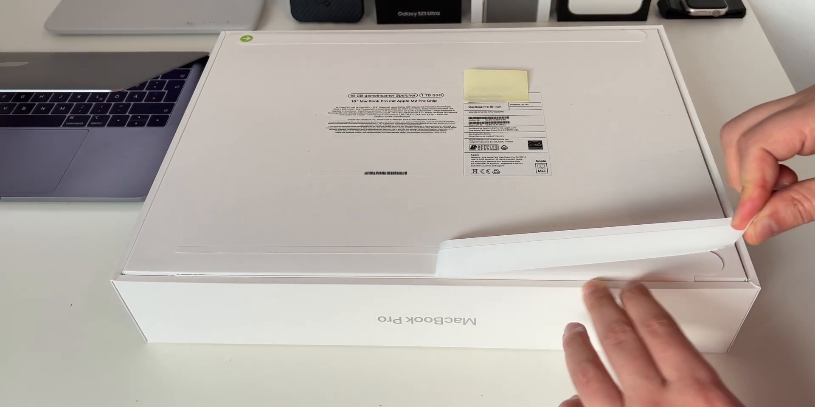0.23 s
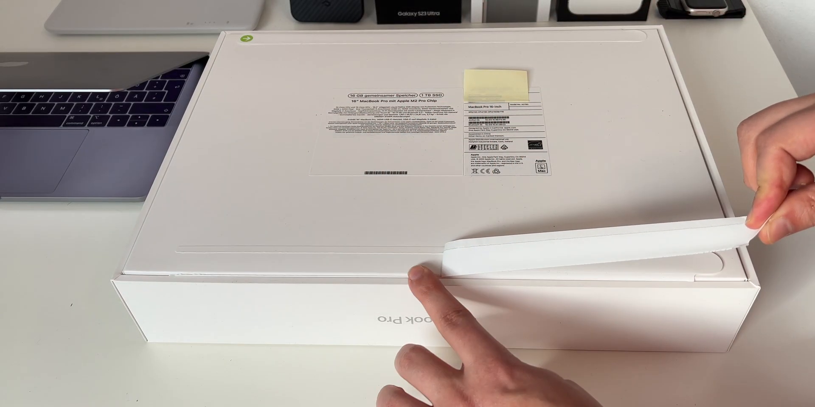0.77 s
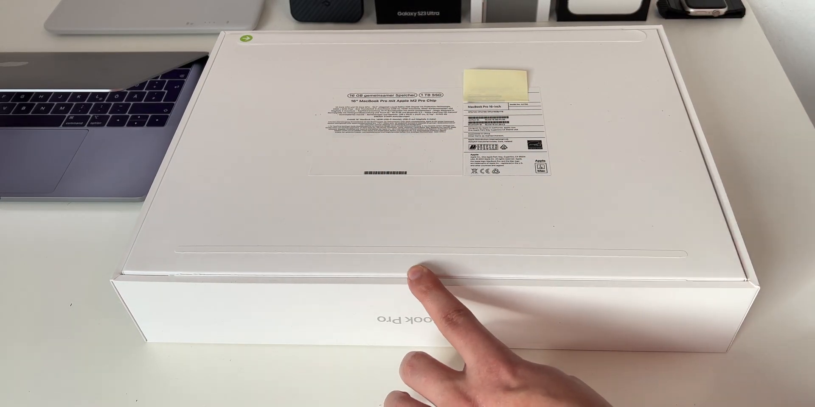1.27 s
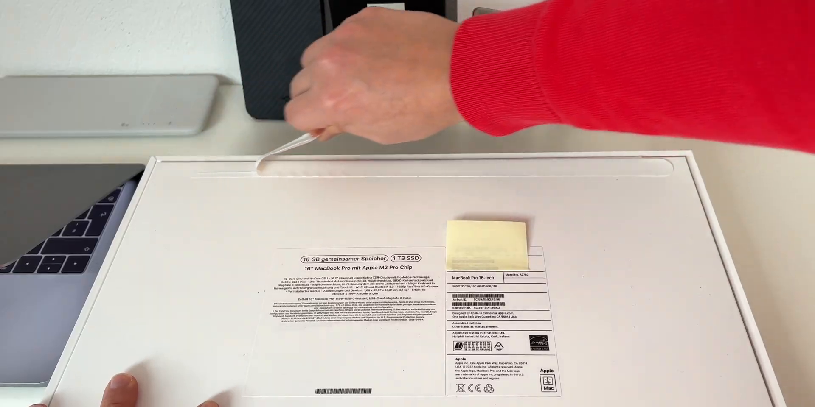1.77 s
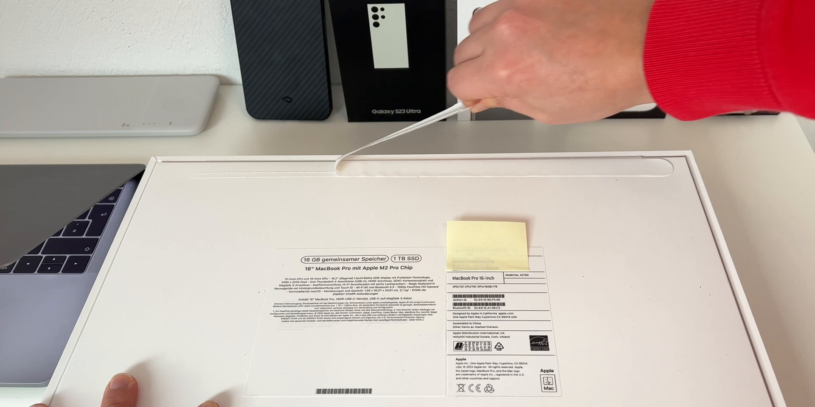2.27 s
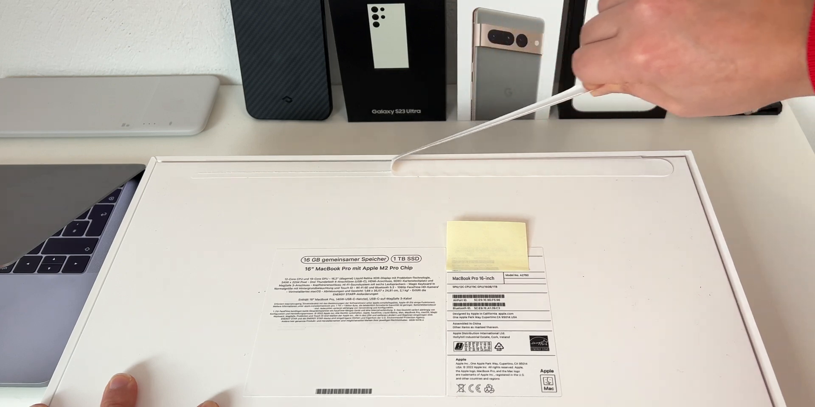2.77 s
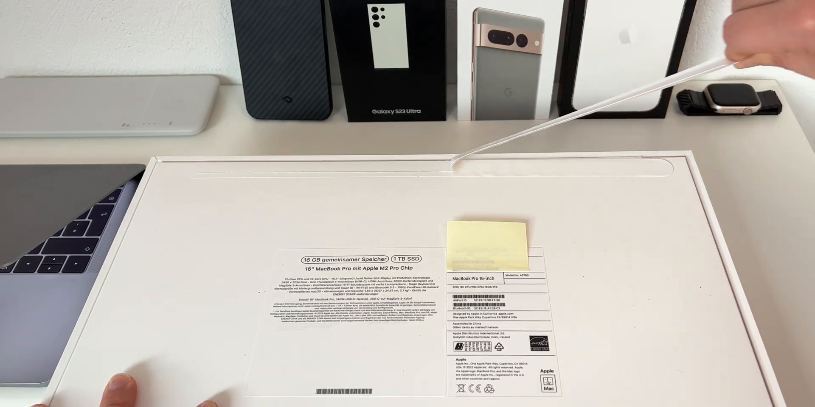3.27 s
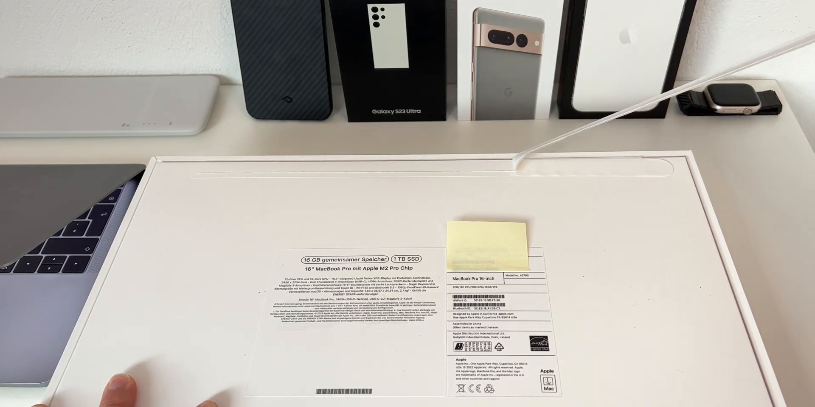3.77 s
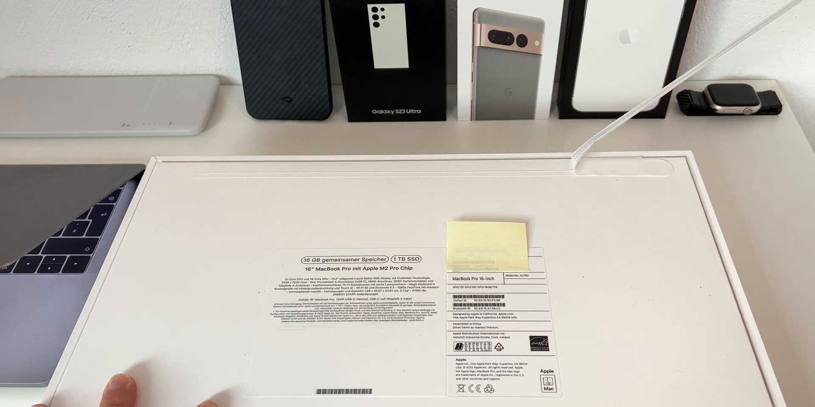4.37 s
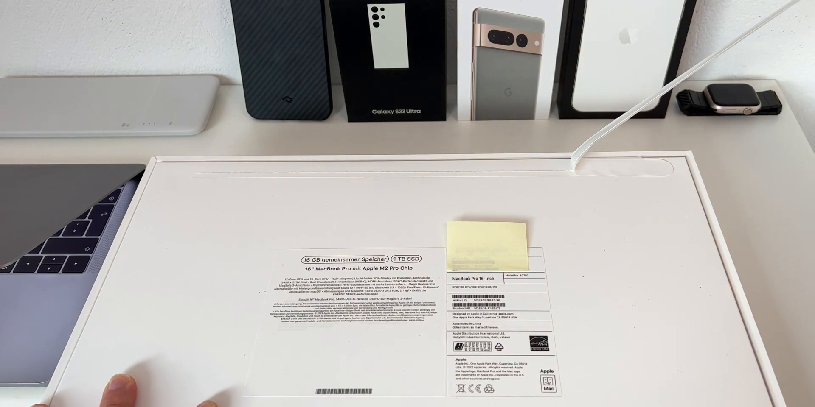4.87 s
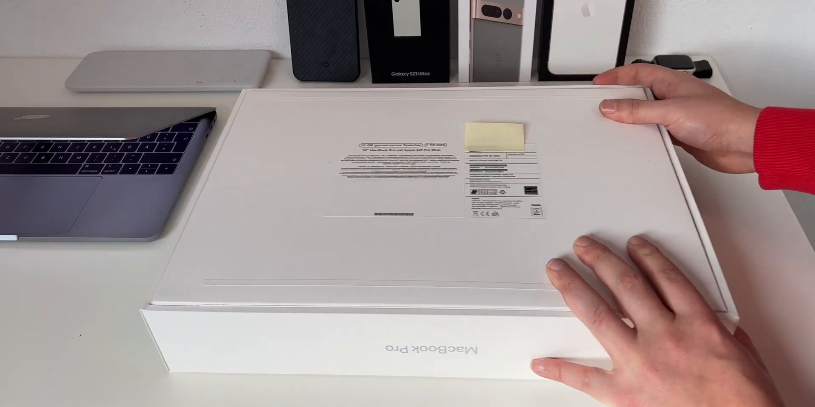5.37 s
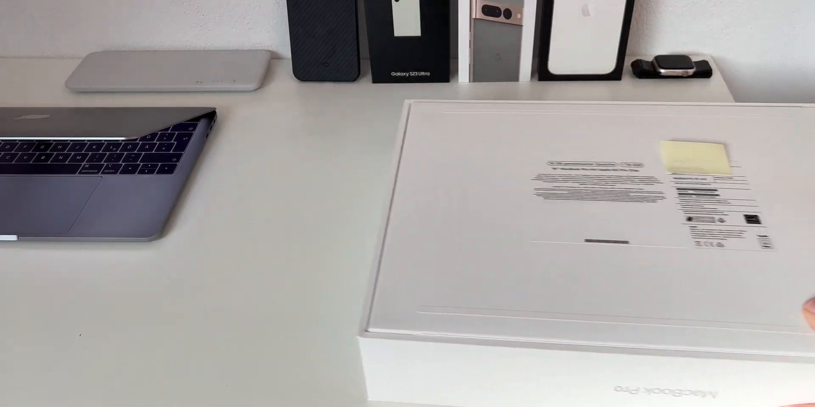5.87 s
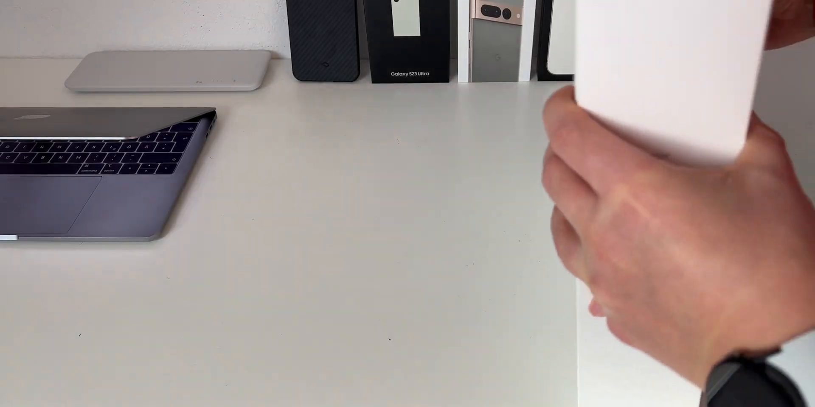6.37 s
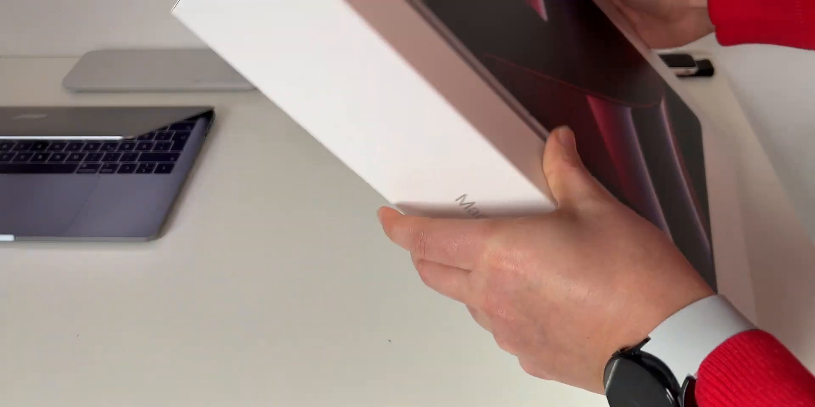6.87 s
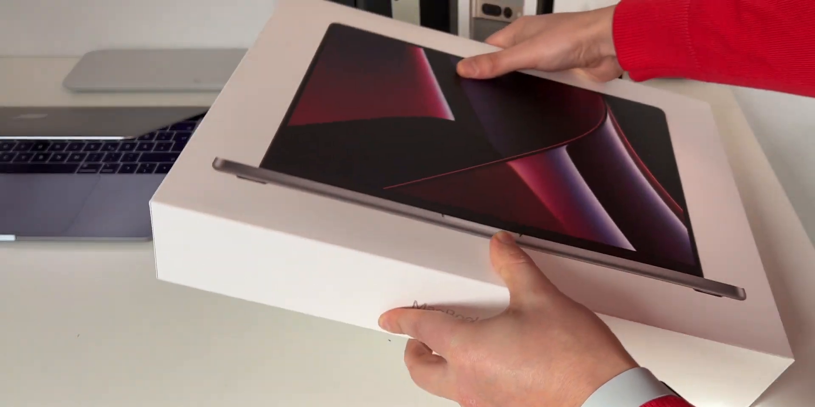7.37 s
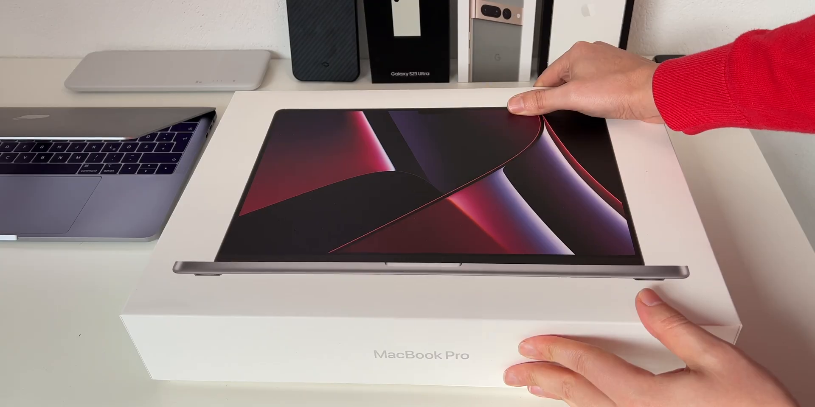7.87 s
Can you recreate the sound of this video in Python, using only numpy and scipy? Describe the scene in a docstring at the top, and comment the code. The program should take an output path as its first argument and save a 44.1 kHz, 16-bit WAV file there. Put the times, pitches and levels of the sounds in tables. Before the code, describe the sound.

Close stereo pickup in a quiet room with a faint wavering rumble, slight hiss and a short soft reverb. From 0 to 0.35 s glued paper crackles and snaps, thinning to sparse ticks and faint finger rubbing. At 0.9 s a dense rip swells, ending in a hard pop at 1.2 s. After a cut near 1.4 s, a second strip peels slowly until 4.3 s: grainy crackle with irregular sharp snaps, its colour shifting as the strip lengthens. A pause, then a loud, fast rip at 4.95 s and a pop at 5.02 s. Around 5.12 s the box is set down in clustered hollow knocks, then slides with smooth hiss from 5.25 to 6 s, ending in a click. From 6.25 s come low drags, bumps and skin rubbing while it turns. At 7.63 s it drops flat with a heavy, ringing thud, then settles softly past 8 s.

```python
"""On a desk in a quiet, faintly rumbling room, two paper strips peel off a large cardboard box in crackling breaks
and snaps; each ends in a dense rip and a pop. Fingers rub the box between pulls. Then the box is set down, slid in
smooth friction over the desk, dragged, turned in the hands and dropped flat: its modes ring in a heavy thud and it
settles. A stereo microphone pair hears level and arrival time, with decaying noise as the room's reply.
The sound is an edit of several shots, so some tails stop short."""
import sys
import numpy as np
from scipy import signal
from scipy.fft import rfft, irfft
from scipy.io import wavfile
from scipy.ndimage import map_coordinates

SR = 44100
rng = np.random.default_rng(int(sys.argv[2]) if len(sys.argv) > 2 else 0)


def wav_record(signal):
    """Record a signal, one row per channel, as 16-bit PCM in the file named by sys.argv[1]."""
    frames = np.transpose(np.atleast_2d(signal))
    bounded = np.clip(frames, -1, 1)
    # unit amplitude maps onto the largest positive 16-bit level
    quanta = np.round(bounded * 32767).astype(np.int16)
    wavfile.write(sys.argv[1], SR, quanta)


N = 357651
T = np.arange(N) / SR
ROOM_BASS_HZ = 160   # bass below this is much alike on both sides
# where each shot begins: [start_s]
SHOT_STARTS = [0, 1.385, 5.072, 6.04, 6.745, 7.872]


def amp(db):
    """Decibels to amplitude."""
    return 10 ** (np.asarray(db) / 20)


def rms_one(x):
    """Scales a signal to an RMS of one."""
    return x / np.sqrt(np.mean(x ** 2) + 1e-20)


def at_hz(points, hz):
    """Reads the second column of a table at a frequency, on a logarithmic axis."""
    points = np.array(points)
    return np.interp(np.log(hz), np.log(points[:, 0]), points[:, 1])


def colour(x, tone, size=4096):
    """A causal (minimum-phase) filter of the given spectrum, from its folded cepstrum."""
    hz = np.arange(size // 2 + 1) * SR / size + 1
    cepstrum = irfft(np.log(amp(at_hz(tone, hz))))
    cepstrum[1:size // 2] *= 2
    cepstrum[size // 2 + 1:] = 0
    response = irfft(np.exp(rfft(cepstrum)))
    return signal.fftconvolve(x, np.atleast_2d(response), axes=-1)[:, :x.shape[-1]]


def butter(x, hz, kind, order=4):
    """A Butterworth filter."""
    return signal.sosfilt(signal.butter(order, hz, kind, fs=SR, output="sos"), x)


def drift(rate_hz, size):
    """Random wandering of spread one: noise through two equal low-pass poles."""
    r = np.exp(-2 * np.pi * rate_hz / SR)
    noise = rng.standard_normal(size + 8000)
    return rms_one(signal.lfilter([1], [1, -2 * r, r * r], noise)[8000:])


def placed(x, pan_db):
    """Pans a stereo pair, positive to the left: the nearer microphone hears a source louder and earlier."""
    lead_s_per_db, most_lead_s = 4.5e-5, 2e-4
    half_db = np.array([[.5], [-.5]]) * (pan_db + np.zeros(x.shape[1]))
    lead_s = np.clip(half_db * lead_s_per_db, -most_lead_s / 2, most_lead_s / 2)
    at = np.arange(x.shape[1]) + (lead_s - most_lead_s / 2) * SR
    channel = np.arange(2)[:, None] + 0 * at
    return amp(half_db) * map_coordinates(x, [channel, at], order=3)


def fading(x):
    """The end of a shot fades to nothing in 1.2 ms."""
    left_s = T[:x.shape[-1]][::-1]
    return x * np.minimum(left_s / 0.0012, 1)


def wandering_ring(x, t, rows, width_hz, size=256):
    """A resonance whose centre and level move; the centre steps in short blocks."""
    s, hz, db = np.transpose(rows)
    out, state = np.zeros_like(x), np.zeros((2, 2))
    r = np.exp(-np.pi * width_hz / SR)
    for i in range(0, len(t), size):
        w = 2 * np.pi * np.interp(t[i], s, hz) / SR
        poles = [1, -2 * r * np.cos(w), r * r]
        out[:, i:i + size], state = signal.lfilter([1, 0, -1], poles, x[:, i:i + size], zi=state)
    return amp(np.interp(t, s, db)) * rms_one(out)


def friction(rows, tones, per_s, spread_db, clump_db, clump_hz, hiss_db, apart_db, pans_db, blend_s=None, rings=()):
    """Clumped tiny breaks over a hiss, coloured; the surface and the box walls follow their own levels."""
    split_hz = 1500   # under it the box walls radiate, over it the paper or skin itself
    s, surface_db, wall_db = np.transpose(rows)
    span = slice(round(s[0] * SR), min(N, round(s[-1] * SR)))
    t = T[span]
    size_db = spread_db * np.minimum(rng.exponential(1, len(t)), 4)
    sizes = amp(size_db) * rng.choice([-1, 1], len(t))
    breaks = rms_one(sizes * (rng.random(len(t)) < per_s / SR))
    stick_slip = amp(clump_db * drift(clump_hz, len(t)))
    mid = breaks + amp(hiss_db) * rng.standard_normal(len(t))
    # other contact spots reach each microphone
    side = amp(apart_db) * butter(rng.standard_normal(len(t)), ROOM_BASS_HZ, "high", order=1)
    force = stick_slip * (mid + side * [[1], [-1]])
    sound = colour(force, tones[0])
    if blend_s is not None:
        share = np.interp(t, blend_s, [0, 1])
        sound = (1 - share) * rms_one(sound) + share * rms_one(colour(force, tones[1]))
    sound = sound + sum(wandering_ring(force, t, *ring) for ring in rings)
    surface = amp(np.interp(t, s, surface_db)) * rms_one(butter(sound, split_hz, "high"))
    low = butter(sound, split_hz, "low") / stick_slip ** 0.1   # heavy walls even it out
    walls = amp(np.interp(t, s, wall_db)) * rms_one(low)
    out = np.zeros((2, N))
    travel_db = np.linspace(*pans_db, len(t))      # the contact moves along the box
    out[:, span] = placed(surface + walls, travel_db) * signal.windows.tukey(len(t), 400 / len(t))
    return out


def stroke(ease_s, swell_s, hold_s, fade_s, full_db, ease_db, wall_db):
    """A stroke swells, drifts between two levels and dies away; the walls take up the swell more gently."""
    rise_power, fall_db, wall_swell = 1.21, 37, 0.66
    since = np.arange(0, swell_s + hold_s + fade_s, .001)
    swell_db = rise_power * 20 * np.log10(np.clip(since / swell_s, 1e-3, 1))
    corners_s = np.cumsum([swell_s, hold_s, fade_s])
    rest_db = np.interp(since, corners_s, [full_db, ease_db, ease_db - fall_db])
    s = ease_s - hold_s - swell_s + since
    return np.transpose([s, rest_db + swell_db, rest_db + wall_swell * swell_db + wall_db])


def hush():
    """The still room: a low wavering rumble and microphone hiss."""
    # spectrum of the still room: [pitch_hz, level_db per Hz]
    hush_tone = [(38, -13), (55, -8.5), (66, -8.5), (80, -16.5), (1330, -42.5), (7510, -50), (10100, -67.5),
                 (11900, -48.5), (16000, -87.5)]
    noise = colour(rng.standard_normal((2, N + SR)), hush_tone)[:, SR:]
    pair = noise[0] + amp(-7.5) * noise[1] * [[1], [-1]]
    return amp(-58 + 2.2 * drift(3.3, N)) * rms_one(pair)


def strips():
    """Glued paper parts in crackling breaks under slow pulls; the last fast pull on each strip is a dense rip."""
    # pulls on the strips: [time_s, surface_db, box_wall_db]
    first_peel = [(0.0, -31.5, -43), (0.214, -36, -47.5), (0.298, -46, -55), (.36, -47, -76)]
    first_rip = [(0.894, -67.5, -81.5), (0.93, -38, -53), (1.038, -23.5, -27.5), (1.126, -22, -20.5),
                 (1.2, -20.5, -26.5), (1.228, -36.5, -45.5), (1.324, -59.5, -57.5), (1.36, -84, -85)]
    second_peel = [(1.39, -50, -45), (1.409, -39, -39), (1.69, -31.5, -38.5), (2.0, -31, -41.5),
                   (2.5, -35, -41), (3.3, -33, -40.5), (3.88, -35.5, -37.5), (4.25, -40, -44),
                   (4.309, -47.5, -60.5), (4.4, -95, -97)]   # the long slow pull
    second_rip = [(4.92, -63, -66), (4.956, -25, -36), (5.026, -15, -20.5), (5.038, -62, -28),
                  (5.07, -63.5, -72)]
    # their colours: [pitch_hz, level_db per Hz]
    first_peel_tone = [(40, -15), (214, -13.5), (301, -14), (452, -8.5), (554, -11), (1340, -19),
                       (2160, -4.5), (2420, -2), (2770, 0), (9000, -2.5), (12000, -11), (16000, 0)]
    first_rip_tone = [(40, -26), (81, -2.5), (137, -24.5), (354, -11), (615, -15.5), (800, -4.5),
                      (1100, -6.5), (1520, -19.5), (2630, -6.5), (3930, -9), (8340, -14), (12000, -16.5),
                      (16000, -12.5)]
    short_strip_tone = [(40, -16), (93, -3.5), (146, -10), (229, -4.5), (322, -14), (518, -7), (621, -22.5),
                        (760, -13), (1140, -17), (1550, -23), (1700, -27.5), (2500, -17.5), (3100, -14),
                        (3500, -18), (5470, -12), (9000, -19.5), (12000, -24), (16000, -22.5)]
    long_strip_tone = [(40, -11), (99, -1.5), (137, -14.5), (215, 4), (269, -10), (529, -4.5), (680, -12.5),
                       (810, -8.5), (1500, -11), (1750, -13.5), (3200, -20), (3600, 1.5), (4600, -11),
                       (5200, -7.5), (8340, -7.5), (12000, -26), (16000, -17.5)]
    second_rip_tone = [(40, -21), (503, -9), (1070, -9.5), (1210, -16.5), (1550, -9), (1810, -12.5),
                       (4240, 1.5), (5720, -9), (8340, -6.5), (12000, -20.5), (16000, -7.5)]
    # the loose end lengthens and the short colour gives way to the long one: [start_s, end_s]
    strip_grows_s = [2.7, 4.06]
    # rings that wander as the tear travels along the box: [time_s, pitch_hz, level_db against the whole pull]
    panel_ring = [(1.39, 1570, -29), (1.8, 1400, -17), (2.15, 1180, -18.5), (2.5, 950, -19.5),
                  (2.75, 790, -23), (3.2, 810, -50), (3.8, 1400, -18), (4.1, 790, -29), (4.3, 760, -11)]
    strip_ring = [(1.39, 5920, 7), (2.3, 5430, -48), (2.7, 4000, -12), (3.3, 3670, -39), (3.55, 3930, -8),
                  (3.85, 4200, -5), (4.05, 4410, -4), (4.4, 4530, -9)]
    rings = [(panel_ring, 110), (strip_ring, 800)]   # with widths in Hz
    peel_1 = friction(first_peel, [first_peel_tone], per_s=4000, spread_db=2.6, clump_db=2.2, clump_hz=90,
                      hiss_db=-4, apart_db=-6, pans_db=(.8, .3))
    rip_1 = friction(first_rip, [first_rip_tone], per_s=8000, spread_db=6.6, clump_db=1.6, clump_hz=64,
                     hiss_db=0.09, apart_db=-5.5, pans_db=(.3, -.1))
    peel_2 = friction(second_peel, [short_strip_tone, long_strip_tone], per_s=4000, spread_db=3.0, clump_db=2.6,
                      clump_hz=150, hiss_db=-5, apart_db=-5.5, pans_db=(3.8, -.5),
                      blend_s=strip_grows_s, rings=rings)
    rip_2 = friction(second_rip, [second_rip_tone], per_s=8000, spread_db=3.7, clump_db=2.6, clump_hz=60,
                     hiss_db=0.12, apart_db=-6.5, pans_db=(.4, .3))
    return peel_1 + rip_1 + peel_2 + rip_2


def snaps():
    """Each release is a burst under 14 ms that rings the loose paper; the long pull also crackles at random."""
    # single fibres and glue spots letting go, later fingertips unsticking from the card: [time_s, peak_db]
    releases = [(0.036, -23), (0.069, -14), (0.0914, -21), (0.1531, -29), (0.185, -28), (0.2075, -22),
                (0.2239, -19), (0.2778, -39), (0.294, -33), (0.3202, -27), (0.3596, -36.5), (0.4594, -43),
                (0.4853, -28.5), (0.544, -42), (0.5916, -32), (0.6398, -33), (0.9193, -35), (0.9288, -32),
                (0.9632, -24), (1.0415, -15), (1.3825, -39), (1.4032, -26), (1.4172, -29), (1.423, -24),
                (1.4395, -23), (1.4526, -19), (1.4932, -17), (1.5128, -26), (1.5752, -11), (1.586, -26),
                (1.614, -22), (1.625, -27), (1.666, -19), (1.714, -17), (1.841, -27), (1.8833, -24),
                (1.9673, -17), (2.0862, -25), (2.162, -22), (2.202, -23), (2.3638, -26), (2.7077, -25),
                (2.78, -25), (2.9085, -25), (3.158, -23), (3.3094, -23), (3.3831, -10.5), (3.4191, -26),
                (3.526, -33), (3.569, -24), (3.6142, -18), (3.8706, -25), (3.907, -19), (3.9818, -31),
                (4.035, -28), (4.0637, -20.5), (4.091, -27), (4.194, -27), (4.2393, -18), (4.9355, -27),
                (5.518, -20), (5.545, -22), (6.2552, -29), (6.5955, -21.5)]
    # what a release sets ringing: [time_s, pitch_hz]
    release_ring = [(.25, 2700), (.27, 5220), (1.6, 6200), (1.62, 5400), (3.3, 5300), (3.38, 3800),
                    (4.3, 4300), (6.26, 2700), (6.6, 3800)]
    # where the paper parts: [time_s, left_right_db]
    strip_pan = [(1.3, 3), (1.385, 5), (4.3, 2)]
    # small releases all along the long pull: [start_s, end_s]
    crackle_s = [1.42, 4.28]
    crackle_per_s, crackle_db, crackle_spread_db = 150, -31, 2.5
    rise_s, fade_t60_s, width_hz, pitch_scatter, edge_db = .0005, .012, 1500, .1, -8
    out, t = np.zeros((2, N)), T[:600]
    tail = (1 - np.exp(-t / rise_s)) * amp(-60 * t / fade_t60_s)
    born = (rng.random(N) < crackle_per_s / SR) & (T > crackle_s[0]) & (T < crackle_s[1])
    crackle = np.transpose([T, crackle_db + crackle_spread_db * rng.standard_normal(N)])[born]
    noise = butter(rng.standard_normal(N + 600), [800, 7000], "band", order=1)
    scatter = rng.standard_normal(N)
    r = np.exp(-np.pi * width_hz / SR)
    for s, peak_db in [*releases, *crackle]:
        start = round(s * SR)
        pan_db = np.interp(s, *np.transpose(strip_pan))
        hz = np.interp(s, *np.transpose(release_ring)) * (1 + pitch_scatter * scatter[start])
        burst = tail * noise[start:start + 600]
        ring = signal.lfilter([1 - r, 0, r - 1], [1, -2 * r * np.cos(2 * np.pi * hz / SR), r * r], burst)
        tick = ring + amp(edge_db) * burst      # the bare edge of the tick reaches into the mids
        pair = np.outer([1, 1], tick / np.abs(tick).max())
        out[:, start:start + 600] += amp(peak_db) * placed(pair, pan_db)
    return out


def handled_box():
    """Skin rubs and shifts on the card in strokes of friction; the box turns in the hands and settles at last."""
    # strokes: [ease_start_s, swell_s, hold_s, fade_s, full_surface_db, easing_surface_db, walls_against_surface_db]
    handling = [(.65, 0.033, 0.33, 0.03, -67, -53, -19), (6.265, 0.0062, .22, 0.28, -46, -42.5, -0.5),
                (6.62, 0.052, 0.14, 0.13, -45, -47.5, 5), (6.66, .012, 0.019, 0.36, -37, -38, 3),
                (6.9, .01, .15, 0.11, -60.5, -53, 8.5), (7.55, 0.11, .3, 0.12, -59.5, -60.5, 11),
                (7.62, 0.057, 0.022, 0.033, -52.5, -45, 13)]
    turning = [(7.07, .1, .09, 0.4, -39, -39, 4.4)]
    settling = [(8.0, 0.00296, .12, 0.17, -69.5, -66.5, 16.2), (8.11, 0.0092, .09, .01, -60, -61, 9.1)]
    # their colours: [pitch_hz, level_db per Hz]
    handling_tone = [(60, -16), (250, -3), (550, -5.5), (750, -8), (1050, -7), (1300, -9.5), (1900, -6),
                     (2600, -0.5), (4000, -5.5), (8000, -4.5), (12000, -17), (16000, -10)]
    turning_tone = [(60, -25), (300, -11), (420, -5), (580, -3), (720, -9), (1020, -4.5), (1250, -11.5),
                    (1700, -10.5), (2400, -10), (7940, -15.5), (12000, -31), (16000, -27)]
    settle_tone = [(60, -11), (250, -7), (480, 5), (700, -9), (1500, -23), (2600, -37), (16000, -69)]
    out = np.zeros((2, N))
    for rows, tone in [(handling, handling_tone), (turning, turning_tone), (settling, settle_tone)]:
        for row in rows:
            out += friction(stroke(*row), [tone], per_s=3000, spread_db=3.0, clump_db=1.65, clump_hz=32,
                            hiss_db=0.1, apart_db=-2.1, pans_db=(-.6, -.7))
    return out


def pops_and_blows():
    """Each pop or blow cracks, rattles and rings all box modes, highs first, for 1/3 s or until its shot ends."""
    # pops of the strips and blows on the box:
    # [time_s, crack_db, thud_db, boom_db, knock_db, ring_length_share, left_right_db]
    hit_rows = [(.5142, -39, -54, -59, -58, 0.99, 2.5), (1.2013, 1.5, -31.5, -30, -20, 0.12, 2.5),
                (5.0225, -5, -33, -32.5, -20.5, 0.2, 1.5), (5.114, -34, -40, -28, -18.5, 0.32, -5),
                (5.121, -17.5, -22, -8.5, -16.5, 0.4, 0.5), (5.1277, -9, -30.5, -12.5, -24, 0.95, -1),
                (5.1583, -10, -25, -25, -18, 0.74, -1), (5.9817, -13, -40.5, -36.5, -35, 0.85, 3.5),
                (6.264, -57, -25.5, -28.5, -43.5, 1.1, 1), (6.4568, -37, -66, -62, -48, .26, 0),
                (6.6285, -50, -26.5, -27.5, -21, 0.27, 2), (6.66, -22, -26, -40, -36, 1.1, 3.5),
                (7.1, -73, -49, -29.5, -46.5, 1.23, -1.5), (7.423, -60, -58, -47, -54, 0.24, 1),
                (7.489, -52, -49, -55, -48, .3, 1), (7.558, -39.5, -47, -63, -45, 0.49, -1.5),
                (7.587, -39, -60, -55, -49, .3, -3), (7.6282, -14.5, -8.5, -15, -5.5, 1.3, 0.1),
                (7.638, -35, -9, -16, -11, 1.39, 3), (7.8, -42, -32, -52, -38, 0.86, -3)]
    # modes of box and desk top, before each hit's shift and share: [pitch_hz, level_db, t60_s]
    box_modes = [(42.6, -11, 0.89), (63.7, 3.5, 0.24), (81.4, -8.5, 0.49), (99.4, -2.5, 0.69),
                 (124.2, -3, 0.45), (152, 0, 0.19), (178.2, -4.5, 0.4), (231.9, -2, 0.44), (266, 3, 0.1),
                 (323.1, 0.5, 0.29), (360.3, -2.5, 0.27), (417.6, -5, 0.32), (465, 2.5, 0.11),
                 (513.7, -1, 0.18), (573, 4, 0.12), (686, 2, 0.086), (891, -3, 0.096), (1042, 7.5, 0.035),
                 (1500, -1, 0.078), (1818, -3.5, 0.097)]
    # where thud, boom, knock and tap are read: [pitch_hz]
    hit_bands_hz = [90, 190, 450, 1400]
    crack_t60_s, rattle_t60_s, rattle_db, rattle_rise_s = 0.041, 0.39, -14, 0.0036   # rattle t60 before its share
    tap_db, tap_follows = -7, 0.38   # the high modes lie between knock and crack
    detune = 0.047                   # each grip shifts the modes a little
    spread_cycles, latest_s = 1.1, .009   # bending waves: the lows arrive later than the highs, up to 9 ms
    ring_rise_cycles = 0.41          # walls take a moment to get going
    out, size = np.zeros((2, N)), SR // 3
    rest_hz, mode_db, t60 = np.array(box_modes).T[:, :, None]
    chance = rng.standard_normal((len(hit_rows), 4, len(box_modes), 1))
    noise = butter(rng.standard_normal((len(hit_rows), 2, size)), [700, 6000], "band", order=1)
    # loose parts rattle duller than the crack
    loose = butter(rng.standard_normal(noise.shape), [250, 2500], "band", order=1)
    for k, (s, crack_db, thud_db, boom_db, knock_db, share, pan_db) in enumerate(hit_rows):
        high_db = knock_db + tap_db + tap_follows * (crack_db - knock_db)
        bands_db = [thud_db, boom_db, knock_db, high_db]
        start = round(s * SR)
        end = min([round(cut * SR) for cut in SHOT_STARTS if cut > s] + [N, start + size])
        since, share = T[:end - start], np.clip(share, .05, 2)
        crack = noise[k, 0, :end - start] * amp(crack_db - 60 * since / crack_t60_s)
        rattle = loose[k, :, :end - start] * amp(knock_db + rattle_db - 60 * since / (rattle_t60_s * share))
        rattle = rattle * (1 - np.exp(-since / rattle_rise_s))
        hz = rest_hz * (1 + detune * chance[k, 0])
        t = np.maximum(since - np.minimum(spread_cycles / hz, latest_s), 0)
        level_db = mode_db + at_hz(list(zip(hit_bands_hz, bands_db)), hz)
        near_card = 1.38 * amp(-60 * t / (t60 * 0.22))
        whole_box = 0.71 * amp(-60 * t / (t60 * share))
        rise = 1 - np.exp(-hz * t / ring_rise_cycles)
        # a randomly detuned twin makes each ring denser and rougher
        twin_hz = hz * (1 + detune * chance[k, 3])
        pair = .6 * (np.sin(2 * np.pi * hz * t) + np.sin(2 * np.pi * twin_hz * t))
        ring = amp(level_db) * (near_card + whole_box) * rise * pair
        apart_db = np.minimum(hz / ROOM_BASS_HZ, 3.0)      # long waves reach both microphones more alike
        sides = amp(apart_db * chance[k, 1:3])[:, :, 0] @ ring + crack + rattle
        out[:, start:end] += fading(placed(sides, pan_db))
    return out


def slid_box():
    """Smooth card slides over the desk: dense, even friction."""
    # the slide: [time_s, surface_db, box_wall_db]
    slide = [(5.25, -48, -45.5), (5.418, -32, -43.5), (5.54, -30, -39), (5.852, -34.5, -45.5),
             (5.978, -34, -42.5), (6.04, -45, -42)]
    # its colour: [pitch_hz, level_db per Hz]
    slide_tone = [(40, -15), (75, -23), (156, -9), (224, -6), (744, -1.5), (977, -1.5), (2830, 1.5),
                  (9000, 1), (12000, 1), (16000, 2)]
    return friction(slide, [slide_tone], per_s=12000, spread_db=1.3, clump_db=0.87, clump_hz=33,
                    hiss_db=3.85, apart_db=0.09, pans_db=(.3, .2))


def drags():
    """The heavy box drags and rocks on the desk: as its weight shifts, practically only the walls sound."""
    # strokes: [ease_start_s, swell_s, hold_s, fade_s, full_db, easing_db, walls_against_these_db]
    drag_strokes = [(6.251, 0.0184, 0.48, 0.11, -53, -41, 0.018), (6.899, 0.034, 0.15, 0.11, -50, -46.5, 0)]
    # their colour: [pitch_hz, level_db per Hz]
    drag_tone = [(30, -16), (60, 0), (110, 6), (180, -12.5), (300, 0), (600, -42), (16000, -90)]
    out = np.zeros((2, N))
    for row in drag_strokes:
        walls_only = stroke(*row) + [0, -120, 0]   # the surface is pushed out of hearing
        out += friction(walls_only, [drag_tone], per_s=1800, spread_db=2.2, clump_db=5.0, clump_hz=25,
                        hiss_db=0.1, apart_db=-21, pans_db=(.1, .1))
    return out


def room(x):
    """Decaying noise per side and octave, shared in the bass; each shot reverberates on its own."""
    # decay of the room: [pitch_hz, t60_s]
    room_t60 = [(60, 0.35), (250, 0.3), (1000, 0.21), (4000, 0.23)]
    t, noise = T[:SR // 2], rng.standard_normal((2, SR // 2))
    shared_bass = butter(noise[0], ROOM_BASS_HZ, "low", order=2)
    noise = butter(noise, ROOM_BASS_HZ, "high", order=2) + shared_bass
    tail = np.zeros_like(noise)
    for hz in 40 * 2.0 ** np.arange(9):
        octave = butter(noise, [hz, 2 * hz], "band", order=2)
        tail += octave * amp(-60 * t / at_hz(room_t60, hz * 2.4))
    tail = tail * np.clip((t - .002) / 0.0015, 0, 1)   # the first walls answer after 2 ms
    # soft furnishings return little treble
    tail = butter(tail / np.sqrt(np.sum(tail ** 2) / 2), 3020, "low", order=1)
    out = np.zeros_like(x)
    cuts = [round(s * SR) for s in SHOT_STARTS] + [N]
    for a, b in zip(cuts, cuts[1:]):
        out[:, a:b] = fading(signal.fftconvolve(x[:, a:b], tail, axes=1)[:, :b - a])
    return out


def scene():
    """The box and its strips close by, the room's reply 1.5 dB down in gain, and the hush."""
    near = strips() + handled_box() + slid_box() + drags() + snaps() + pops_and_blows()
    return near + amp(-1.5) * room(near) + hush()


def record(dry):
    """The microphone drops the deepest bass, the top is cut by 16.5 kHz and peaks over full scale clip."""
    heard = butter(dry, 39.7, "high", order=5)
    top_cut = signal.cheby2(12, 70, 16500, fs=SR, output="sos")
    return np.clip(signal.sosfilt(top_cut, heard), -1, 1)


dry = scene()
out = record(dry)
wav_record(out)
```